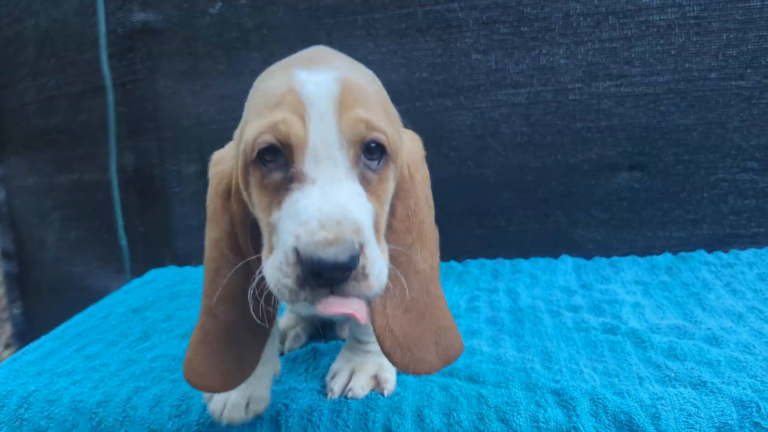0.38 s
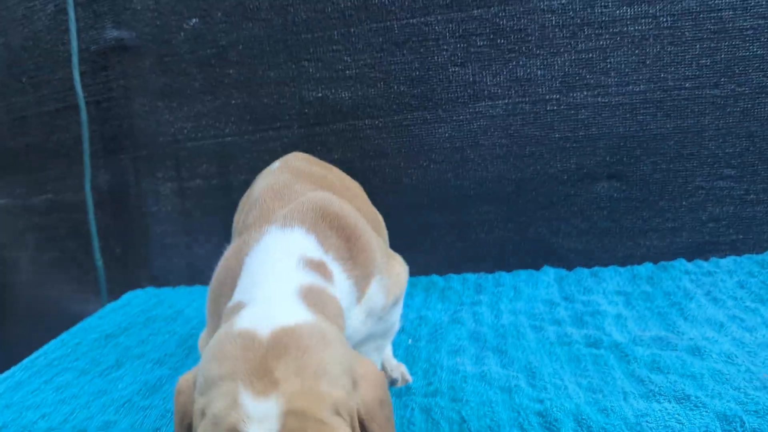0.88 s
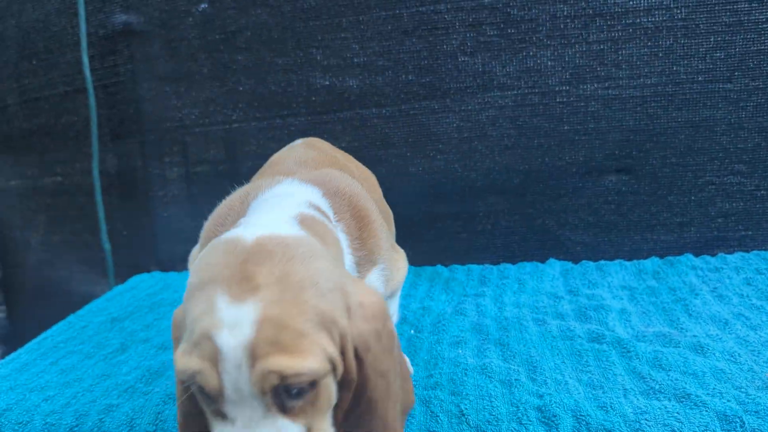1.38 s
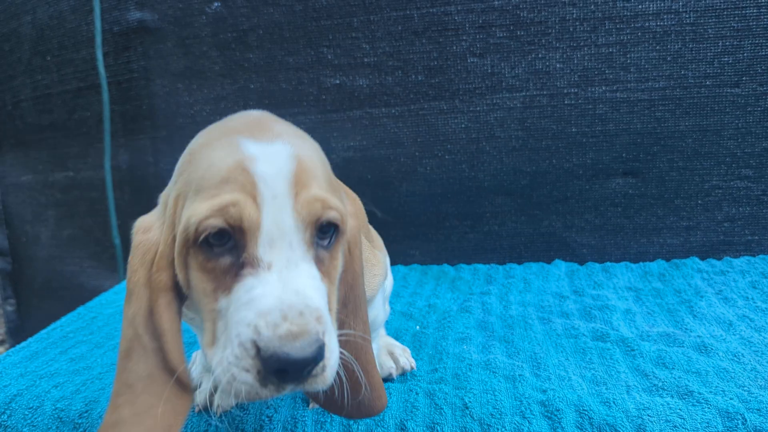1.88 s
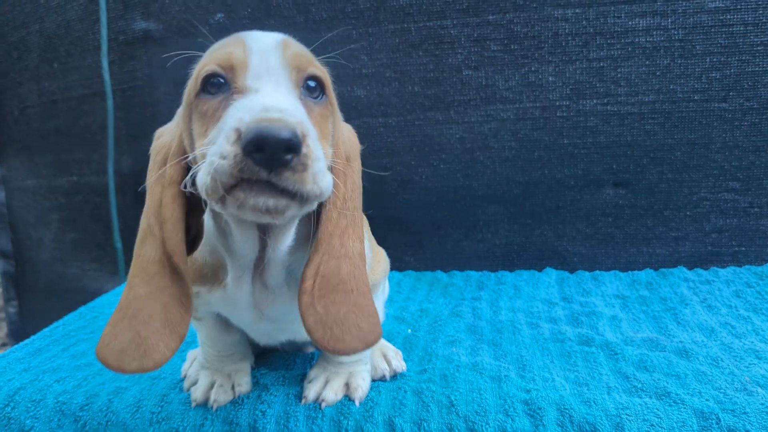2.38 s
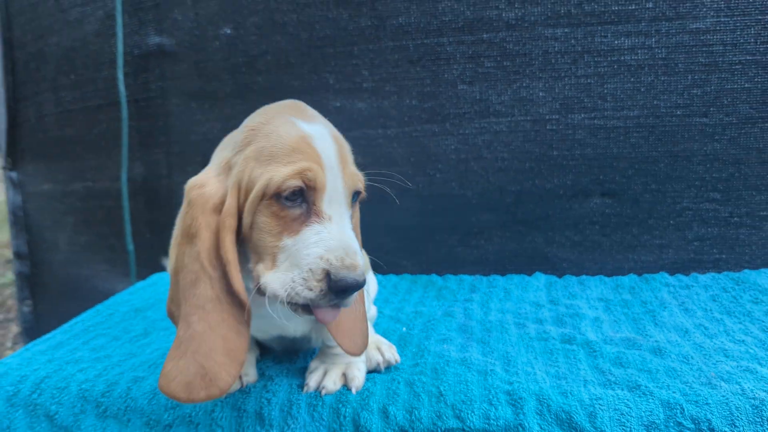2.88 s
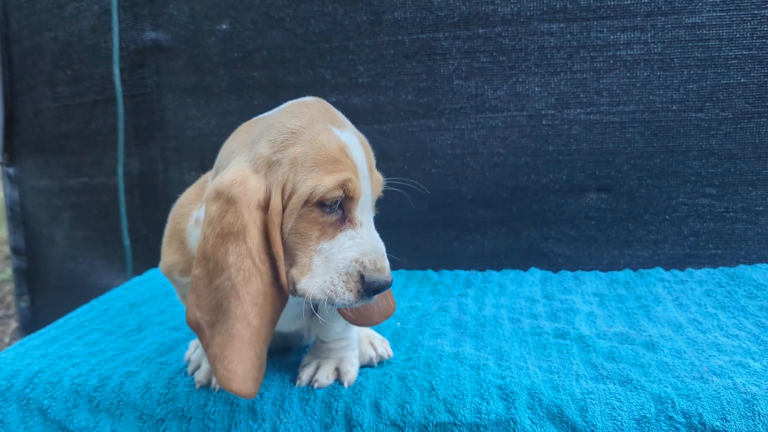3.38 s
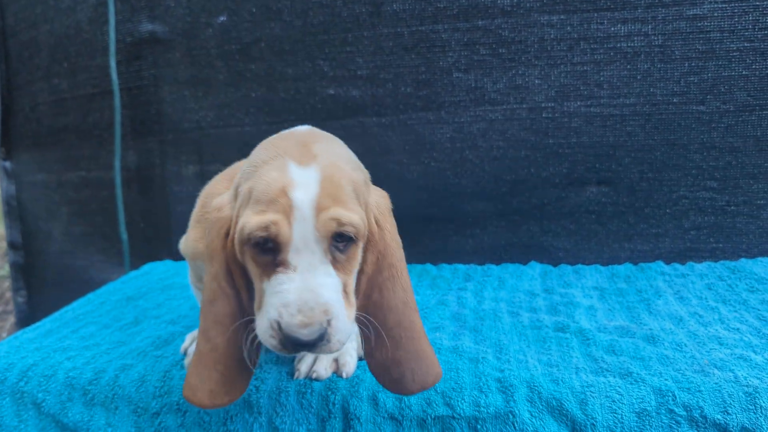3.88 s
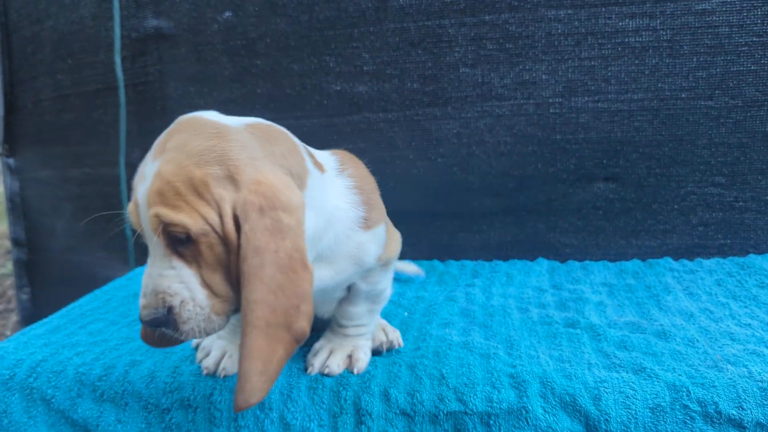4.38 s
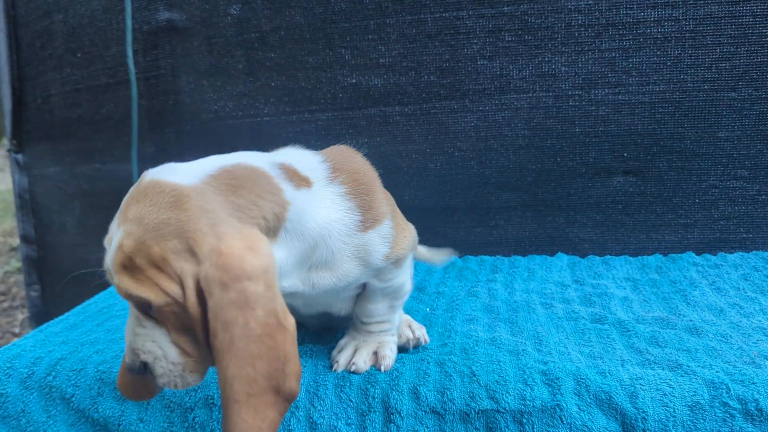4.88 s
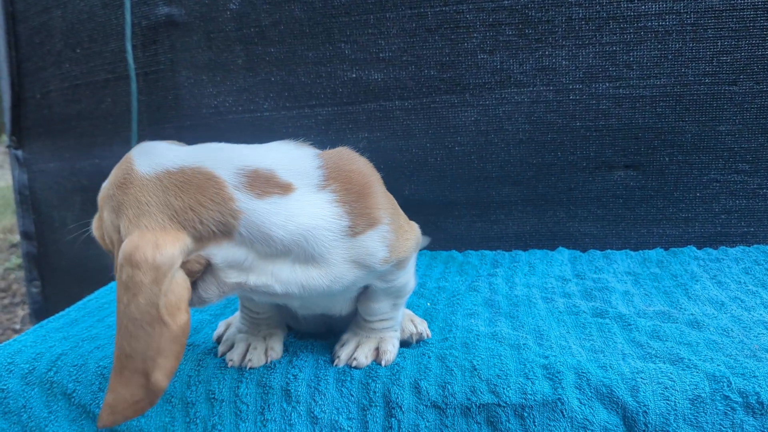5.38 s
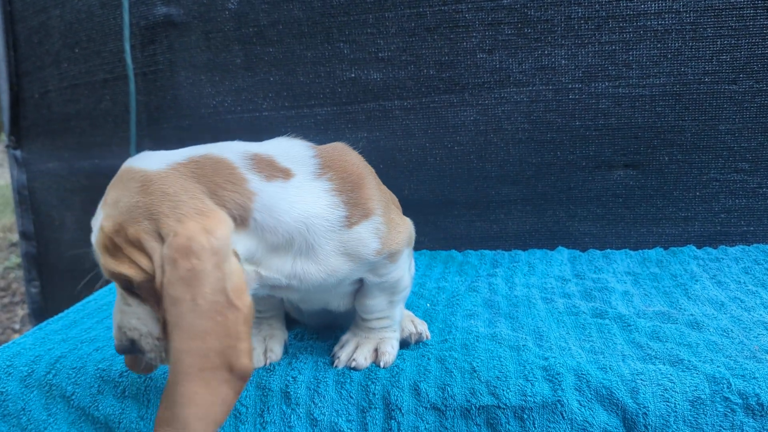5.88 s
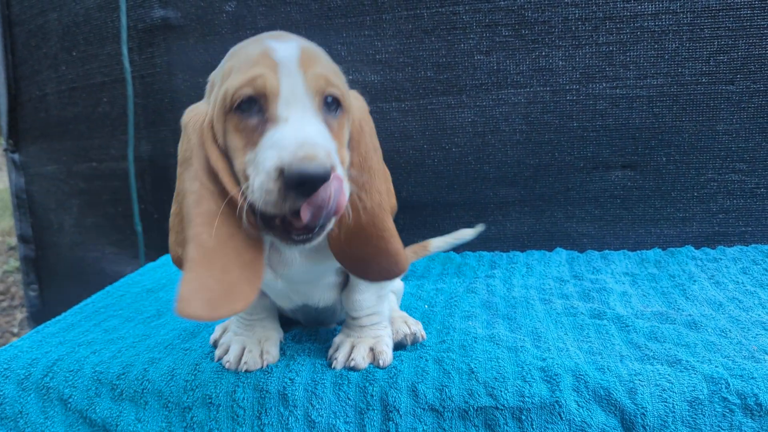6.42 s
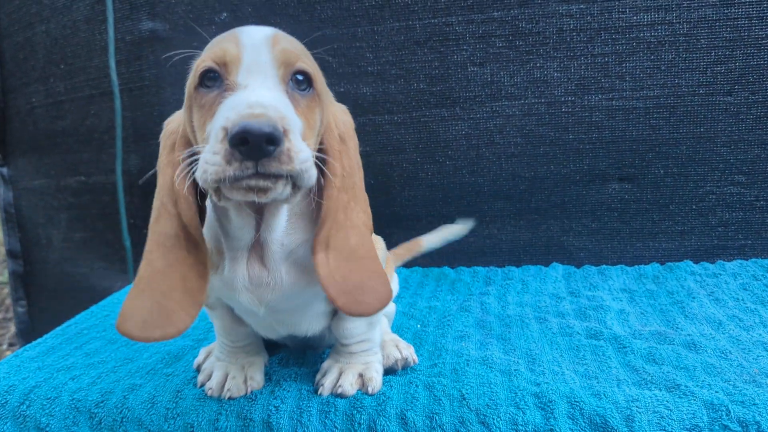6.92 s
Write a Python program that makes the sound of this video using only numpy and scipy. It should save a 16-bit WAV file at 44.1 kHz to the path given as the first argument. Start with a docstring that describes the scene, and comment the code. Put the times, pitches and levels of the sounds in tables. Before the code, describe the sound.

Close puppy sniffs, sharp clicks and soft paw thumps over thin insect song, a distant howl, hard handling taps, a low engine drone and a final nasal squeak.

```python
"""Insects sing over a low rumble; after a faint rustle a puppy sniffs, licks, ticks, whines and steps close by.
Fingers then rub and tap the camera by its right port, a far dog howls, an engine drone swells; last come
whimpers, a sigh and nasal whistles. Voices are harmonic sums, hisses are shaped noise, and knocks are
decaying modes. Resonators and sparse decaying echoes supply the insects' rasp and the reverberation."""
import sys
import numpy as np
from scipy import signal
from scipy.io import wavfile
from scipy.ndimage import uniform_filter1d

SR = 44100
rng = np.random.default_rng(int(sys.argv[2]) if len(sys.argv) > 2 else 0)


def natural_amplitude(level_db):
    """Convert a level in decibels to a linear amplitude factor, elementwise."""
    exponent = np.asarray(level_db, float) / 20
    return 10 ** exponent


def wrap_up_sound(samples):
    """Save the sound to the file named by the first command line argument, as 16-bit audio."""
    columns = np.atleast_2d(samples).T
    # keep every value between -1 and 1, then stretch to whole-number steps
    tamed = np.clip(columns, -1, 1)
    steps = np.round(tamed * 32767).astype(np.int16)
    wavfile.write(sys.argv[1], SR, steps)


N = 310023
T = np.arange(N) / SR

# swelling insect band: (time [s], level [dB], centre frequency [Hz])
INSECT_BAND = [(0, -62, 4250), (.47, -67.5, 4227), (1, -56, 4220), (1.25, -62.5, 4225), (1.8, -53.5, 4228),
               (2.12, -59, 4233), (2.7, -57.5, 4283), (3.28, -60.5, 4267), (3.55, -57, 4273),
               (3.82, -49, 4130), (4.05, -57.5, 4250), (4.3, -61, 4210), (4.55, -49.5, 4354),
               (5, -62.5, 4243), (5.45, -55, 4237), (5.72, -56, 4370), (5.97, -63.5, 4208),
               (6.2, -50.5, 4166), (6.46, -53, 4207), (6.68, -59.5, 4280), (7.03, -49.5, 4334)]
CHORUS_MEAN_DB = -58
# engine drone: (time [s], firing frequency [Hz], tone level [dB])
ENGINE = [(0, 79.1, -84), (2.4, 81.1, -91.5), (2.9, 80.5, -80), (3.4, 80.45, -65), (3.8, 81.48, -59.5),
          (5.6, 81.64, -58), (6.15, 77.4, -58), (6.7, 79.5, -58), (7.03, 79.2, -56.5)]
RUMBLE_NEAR_DB = -68.5
# likeness of left and right in the far sounds: (frequency [Hz], correlation [0-1])
LIKENESS = [(60, 0.86), (180, 0.9), (550, 0.5), (1650, 0.01), (4970, 0.027), (15000, 0.033)]


def read(points, hz):
    """Interpolation on a logarithmic frequency axis."""
    f, value = np.transpose(points)
    return np.interp(np.log(hz + 1), np.log(f + 1), value)


def joined(tables, t, edge=0.028):
    """Linear interpolation of the columns at times t, and a gate with ramps of edge seconds around each table."""
    s, *columns = np.transpose(np.concatenate(tables))
    gates = [np.clip(np.minimum(t - r[0][0], r[-1][0] - t) / edge + 1, 0, 1) for r in tables]
    return np.max(gates, 0), [np.interp(t, s, c) for c in columns]


def panned(pan_db):
    """Interchannel level difference (left minus right): two gains whose mean is 1."""
    ratio = natural_amplitude(pan_db)
    return np.array([2 * ratio / (1 + ratio), 2 / (1 + ratio)])


def wander(smooth_s):
    """Low-pass random modulation: noise averaged twice over smooth_s, scaled to rms 1."""
    span = max(int(smooth_s * SR), 2)
    x = uniform_filter1d(uniform_filter1d(rng.standard_normal(N), span), span)
    return x / x.std()


def noise(gain, same, size, patchy_db=1.0):
    """Spectral shaping of noise by gain(hz, t), with correlation same(hz) and random patches."""
    hz, t, z = signal.stft(rng.standard_normal((3, N)), SR, nperseg=size, noverlap=size * 3 // 4)
    hz = hz[:, None]
    patches = uniform_filter1d(uniform_filter1d(abs(z[2]), size=10, axis=0), size=24, axis=1)
    patches = patches - patches.mean()
    c = np.clip(same(hz), -1, 1)
    pair = np.array([z[0], c * z[0] + np.sqrt(1 - c ** 2) * z[1]])
    pair *= gain(hz, t) * natural_amplitude(patchy_db * patches / patches.std())
    return signal.istft(pair, SR, nperseg=size, noverlap=size * 3 // 4)[1][:, :N]


def resonate(x, hz, width_hz):
    """Heterodyne resonator: shifts the curve hz to zero, smooths by two equal poles and shifts back."""
    turn = np.exp(2j * np.pi * np.cumsum(hz) / SR)
    r = np.exp(-np.pi * width_hz / SR)
    smooth = signal.lfilter([(1 - r) ** 2], [1, -2 * r, r * r], x / turn + 1e-18)
    return 2 * (turn * smooth).real


def add(mix, s, sound, pan_db):
    """Superposition: adds a short sound to the mix at time s."""
    part = mix[:, round(s * SR):][:, :len(sound)]
    part += panned(pan_db)[:, None] * sound[:part.shape[1]]


def tail(decays, gap_s):
    """Reverberation: sparse echoes of random sign after gap_s, each band with its own decay time."""
    taps = np.zeros((2, 2 * SR))
    at = np.arange(int(gap_s * SR), 2 * SR - 20, 20)
    at = at + rng.integers(0, 20, (2, len(at)))
    np.put_along_axis(taps, at, rng.choice([-1., 1.], at.shape), 1)
    taps[1] = 0.5 * taps[0] + 1.86 * taps[1]
    hz, t, z = signal.stft(taps, SR, nperseg=512)
    out = signal.istft(z * natural_amplitude(-60 * t / read(decays, hz)[:, None]), SR, nperseg=512)[1]
    return out / np.linalg.norm(out[0])


def chorus():
    """Resonance: the rasp of many insects excites two close wing resonances and throbs near 39 Hz."""
    strands, strand_spread_hz, strand_db = 4, 129.6, -6  # single singers that waver inside the band
    _, (level_db, hz) = joined([INSECT_BAND], T)
    pan_db = -4.5 - 0.28 * (level_db - CHORUS_MEAN_DB)  # the swells come from the right
    throb = 1 + 0.18 * np.sin(2 * np.pi * np.cumsum(39 * (1 + 0.029 * wander(0.28))) / SR)
    a, b = rng.standard_normal((2, 2, N))
    pair = np.array([a, .5 * a + 1.9 * b]) * throb
    rasp = resonate(pair[:, 0], hz - 80, width_hz=253) + resonate(pair[:, 1], hz + 80, width_hz=250)
    for _ in range(strands):
        strand_hz = hz + strand_spread_hz * wander(0.1225)
        strand = resonate(rng.standard_normal(N) * throb ** 2, strand_hz, width_hz=54)
        rasp += natural_amplitude(strand_db) * rasp.std() * strand / strand.std() / np.sqrt(strands)
    return rasp / rasp.std() * natural_amplitude(level_db) * panned(pan_db)


def crickets():
    """Amplitude modulation: each phrase is a row of soft tone pulses under an arch, blurred by distance."""
    # phrases: (centre of first pulse [s], pitch [Hz], relative level [dB])
    phrases = [(0, 5330, -72), (1.373, 5370, -60.5), (1.665, 5300, -56.5), (1.743, 5840, -78),
               (2.202, 5500, -78), (2.289, 5340, -57.5), (2.945, 5320, -58.5), (2.995, 6100, -64.5),
               (3.198, 5360, -61.5), (3.555, 5280, -57), (3.95, 5380, -63), (4.2, 6030, -78),
               (4.322, 5280, -58.5), (4.706, 5410, -56.5), (4.993, 6030, -67), (5.133, 5300, -52),
               (5.295, 5980, -68), (5.65, 5530, -58), (5.706, 6100, -64), (6.081, 5430, -56.5),
               (6.103, 6250, -60.5), (6.173, 5310, -51), (6.923, 5320, -50)]
    pulse_count, pulse_s = 5, .0435
    mix = np.zeros((2, N))
    for first, hz, db in phrases:
        t = np.arange(0, pulse_count * pulse_s, 1 / SR)
        pulses = 0.28 + np.sin(np.pi * t / pulse_s) ** 4
        arch = abs(np.sin(np.pi * t / t[-1])) ** 0.27
        blur = resonate(rng.standard_normal(SR)[:len(t)], np.full(len(t), hz), width_hz=180)
        tone = np.sin(2 * np.pi * hz * t) + 0.57 * blur / blur.std()
        add(mix, max(first - pulse_s / 2, 0), natural_amplitude(db - 10.5) * arch * pulses * tone, -14)
    return mix


def rumble_db(t):
    """Power sum of two rumbles: the engine's, which grows with its tone, and one that fades from the start."""
    tone_db = joined([ENGINE], t)[1][1]
    engine_db = RUMBLE_NEAR_DB + 0.65 * (tone_db + 59)
    first_db = -75.5 - 11 * t
    return 20 * np.log10(np.hypot(natural_amplitude(engine_db), natural_amplitude(first_db)))


def drone():
    """Periodic combustion: a wavering firing tone with weak higher orders over low rumble."""
    # rumble spectrum: (frequency [Hz], relative level [dB])
    rumble_colour = [(28, -30.5), (42, -1.5), (60, -2), (75, 3), (100, -16.5), (250, -18), (500, -21.5),
                     (1000, -28), (2500, -63.5)]
    _, (hz, tone_db) = joined([ENGINE], T)
    phase = 2 * np.pi * np.cumsum(hz * (1 + 0.01126 * wander(0.034))) / SR
    tone = np.sin(phase) + natural_amplitude(-22) * np.sin(9 / 4 * phase) + natural_amplitude(-24) * np.sin(11 / 4 * phase)
    rumble = noise(lambda f, t: natural_amplitude(rumble_db(t) + read(rumble_colour, f) + 32.5),
                   lambda f: read(LIKENESS, f), size=2048)
    return np.sqrt(2) * natural_amplitude(tone_db + 0.98 * wander(0.026)) * tone + rumble


def air():
    """Diffuse field: a far wash whose treble swells with the insects and whose lower part with the rumble."""
    # spectrum of the wash: (frequency [Hz], relative level [dB])
    wash_colour = [(30, -31.5), (95, -32), (165, -47), (330, -46), (600, -43), (2000, -31), (3500, -29),
                   (4900, -26), (5700, -19.5), (6500, -24), (7300, -30.5), (7800, -36.5), (12000, -34),
                   (15000, -35)]
    # balance of the wash: (frequency [Hz], left minus right [dB])
    wash_balance = [(60, 10), (130, -1), (290, -7), (640, 3.5), (1410, 1), (3100, 1.5), (6820, -4),
                    (15000, 4.5)]

    def gain(hz, t):
        treble_db = 0.66 * (joined([INSECT_BAND], t)[1][0] - CHORUS_MEAN_DB)
        middle_db = 10.5 + 0.31 * (rumble_db(t) - RUMBLE_NEAR_DB)
        high = read([(2500, 0), (6000, 1)], hz)
        swell_db = high * treble_db + (1 - high) * middle_db
        return natural_amplitude(-41.5 + read(wash_colour, hz) + swell_db) * panned(read(wash_balance, hz))
    return noise(gain, lambda hz: read(LIKENESS, hz), size=1024, patchy_db=.7)


def sniffs():
    """Broadband noise: sniffs, licks and a faint opening rustle hiss brightly, with a low part of their own."""
    # hisses: (start [s], peak [s], end [s], relative peak level [dB], relative level of the low part [dB])
    hiss_list = [(0, 0.157, 0.26, -80.5, 4.5), (0.312, 0.32, 0.44, -71.5, -15),
                 (0.494, 0.508, .585, -65.5, -41), (0.583, 0.627, 0.75, -64.5, -0.5),
                 (1.996, 2.014, 2.05, -69, -6.5), (2.357, 2.388, 2.42, -66, -1),
                 (2.463, 2.481, 2.55, -67.5, -27), (2.98, 3.078, 3.15, -75, 4.5),
                 (3.278, 3.335, 3.446, -54, -3.5), (3.55, 3.754, 3.95, -78.5, -4),
                 (4.117, 4.144, 4.17, -74.5, -18), (5.67, 5.72, 5.9, -79, 0.5),
                 (6.45, 6.628, 6.66, -60.5, -7), (6.694, 6.825, 7.05, -65.5, -8)]
    # hiss spectrum: (frequency [Hz], relative level [dB])
    hiss_colour = [(150, 9), (600, 1.5), (3000, 4), (6000, 2.5), (9000, -7), (12000, -2.5), (15000, -2.5),
                   (16500, -11)]
    quiet_db, fade_db_per_db = -80, 1.13  # each hiss rises from and sinks towards quiet
    hisses = []
    for *times, db, low_db in hiss_list:
        edge_db = db + fade_db_per_db * (quiet_db - db)
        hisses.append([(s, point_db, low_db) for s, point_db in zip(times, (edge_db, db, edge_db))])

    def gain(hz, t):
        gate, (level_db, low_db) = joined(hisses, t, 0.01)
        low = read([(3000, 1), (9000, 0)], hz)
        return gate * natural_amplitude(level_db + read(hiss_colour, hz) + low * low_db + 9.5) * panned(1.3)[:, None, None]
    return noise(gain, lambda hz: .4, size=256, patchy_db=1.2)


def ticks():
    """Damped resonance: short noise bursts of tongue and claws ring one broad mode each."""
    # ticks: (start [s], peak level [dB], ring frequency [Hz], left minus right [dB])
    tick_list = [(0.055, -57.5, 2800, -20), (0.163, -53.5, 2780, -18), (.27, -62, 2700, -1),
                 (0.396, -59, 2900, 1), (.683, -42.5, 1920, 14), (.751, -58, 2140, -9),
                 (0.898, -38.5, 1800, -1), (.951, -29, 2500, -6), (.962, -34.5, 2490, -0.5),
                 (1.093, -34, 2840, -1), (2.009, -52.5, 3320, -3), (2.325, -44, 4320, -13),
                 (5.028, -53, 2523, -1)]
    mix, t = np.zeros((2, N)), np.arange(6000) / SR
    for s, db, hz, pan_db in tick_list:
        burst = rng.standard_normal(len(t)) * natural_amplitude(-60 * t / 0.022) * np.minimum(t / 0.00048, 1)
        ring = resonate(burst, np.full(len(t), hz), width_hz=980) + 0.026 * burst
        add(mix, s, natural_amplitude(db) * ring / abs(ring).max(), pan_db)
    return mix


def whistle_tones(tables, second_db, pan_db):
    """Near-sinusoidal oscillation: a tone of slightly unsteady pitch with a faint octave."""
    gate, (hz, level_db) = joined(tables, T, 0.001)
    phase = 2 * np.pi * np.cumsum(hz * (1 + 0.0049 * wander(0.00084))) / SR
    tone = np.sin(phase) + natural_amplitude(second_db) * np.sin(2 * phase)
    return np.sqrt(2) * gate * natural_amplitude(level_db) * tone * panned(pan_db)[:, None]


def faint_whines():
    """Exponential envelope: each whine rises quickly and trails off about one pitch."""
    # whines and whistles: (start [s], length [s], pitch [Hz], greatest rms level [dB], left minus right [dB])
    whine_list = [(0.064, 0.093, 964, -58.5, 8), (0.105, .2, 6360, -66, -8), (0.151, 0.15, 929, -55.5, 6),
                  (6.364, 0.25, 7000, -65, -12)]
    rise_s, start_db, end_db = 0.024, -18, -32.5  # ends are relative to the peak
    total = 0
    for s, length, hz, db, pan_db in whine_list:
        course = [(s, hz, db + start_db), (s + rise_s, hz, db), (s + length, hz, db + end_db)]
        total = total + whistle_tones([course], second_db=-22, pan_db=pan_db)
    return total


def thumps():
    """Impact on padding: paws and body excite two damped partials while cloth crumples under the weight."""
    # thumps: (start [s], relative strength [dB], ring frequency [Hz], t60 [s], left minus right [dB])
    thump_list = [(0.363, -54, 102.5, 0.059, 1.5), (0.613, -67, 414, 0.08, -1), (0.636, -44, 385, 0.042, 3),
                  (0.649, -47.5, 149, 0.11, 2), (1.692, -61.5, 484, 0.029, -17),
                  (2.025, -45, 244, 0.057, 2), (2.201, -61.5, 91, 0.057, 2),
                  (2.742, -53.5, 141, 0.075, 1.5), (5.146, -54.5, 164, 0.12, 1.0),
                  (6.253, -51.5, 220, 0.05, -15), (6.283, -44.5, 169.8, 0.037, -22),
                  (6.89, -52, 160, 0.06, 2)]
    mix, t = np.zeros((2, N)), np.arange(6000) / SR
    for s, db, hz, t60, pan_db in thump_list:
        ring = np.sin(2 * np.pi * hz * t)
        ring += 0.75 * np.sin(2 * np.pi * 1.85 * hz * t) * natural_amplitude(-40 * t / t60)
        grain = int(0.305 * SR / hz)  # cloth grain, as a share of the ring's cycle
        cloth = uniform_filter1d(rng.standard_normal(len(t)), size=grain)
        ring += .7 * np.sqrt(grain) * uniform_filter1d(cloth, size=grain)
        add(mix, s, natural_amplitude(db + 7 - 60 * t / t60) * np.minimum(t / 0.0077, 1) * ring, pan_db)
    return mix


def rubs():
    """Friction: skin dragged over the right port gives grainy noise, weak in the left channel up to 9 kHz."""
    # strokes: (time [s], relative pressure level [dB], speed as treble lift [dB])
    strokes = [
        [(.765, -68.5, -28), (.785, -54, -38), (.792, -37.5, -21), (.808, -38.5, -6), (.82, -48, 16),
         (.845, -53, 11.5), (.89, -48.5, 1.5), (.915, -63, -4), (.958, -63, -5)],
        [(.962, -68.5, -5), (1.03, -55, -1.5), (1.06, -44.5, -1.5), (1.1, -46.5, 6.5), (1.14, -56.5, 9.5),
         (1.18, -84, -5)],
        [(1.48, -96, 13), (1.6, -73, -2), (1.69, -100, 2)],
        [(2.31, -101, 3), (2.335, -76.5, -4), (2.42, -90, -4)],
        [(4.44, -67, -37), (4.485, -68, -27), (4.5, -55, -15), (4.64, -66.5, -26), (4.72, -77, -24)],
    ]
    # friction spectrum: (frequency [Hz], relative level [dB])
    friction_colour = [(60, -4), (350, 8.5), (2000, -3), (4500, 2.5), (7500, -0.5), (10000, -8.5),
                       (12500, -32), (16000, -27)]
    balance = [(300, -19.5), (2500, -31.5), (9000, -37.0), (14000, 0.0)]  # (Hz, left minus right dB)

    def gain(hz, t):
        gate, (level_db, treble_db) = joined(strokes, t, 0.0057)
        bass_db = -8 - 0.35 * treble_db - 0.22 * (level_db + 50)  # slow, light strokes rumble more
        treble = read([(2500, 0), (7000, 1)], hz)
        bass = read([(400, 1), (1500, 0)], hz)
        colour_db = read(friction_colour, hz) + treble * treble_db + bass * bass_db
        return gate * natural_amplitude(level_db + colour_db + 10.5) * panned(read(balance, hz))
    return noise(gain, lambda hz: .2, size=256, patchy_db=1.03) * natural_amplitude(2.7 * wander(0.0003))


def taps():
    """Modal excitation: a hard fingertip's crack sounds together with the modes of the camera body."""
    # taps: (start [s], relative strength [dB], relative bass level [dB], left minus right [dB])
    tap_list = [(0.788, -39.5, -14, -30), (3.749, -40, 0, -37), (4.4386, -66.5, 24, -20),
                (4.8415, -37.5, 0, -33), (4.8937, -34.5, -2, -35), (5.258, -49.5, 2.5, -18.5),
                (5.2802, -44, 6.5, -41), (6.2325, -48.5, 4, -32), (6.286, -60, 14.5, -14)]
    # body modes: (frequency [Hz], relative level [dB], t60 [s])
    body_modes = [(252, -4, 0.0092), (348, 6.5, 0.024), (566, 3, 0.013), (1130, -2.5, 0.013)]
    mix, t = np.zeros((2, N)), np.arange(6000) / SR
    body = sum(natural_amplitude(db - 60 * t / t60) * np.sin(2 * np.pi * hz * t) for hz, db, t60 in body_modes)
    dull = signal.butter(4, 5800, fs=SR)
    for s, db, bass_db, pan_db in tap_list:
        crack = 0.7 * rng.standard_normal(len(t)) * natural_amplitude(-60 * t / 0.028)
        crack[[0, 6]] += 3.5, -3  # two clicks of opposite sign
        add(mix, s, natural_amplitude(db + 3.5) * (signal.lfilter(*dull, crack) + natural_amplitude(bass_db - 10.0) * body), pan_db)
    return mix


def howl():
    """Source and filter: a clean fundamental, hoarse overtones and half lines reverberate in the yard."""
    # course of the howl: (time [s], pitch [Hz], relative fundamental level [dB])
    howl_course = [(2.887, 245.2, -63), (2.932, 362.5, -43), (2.992, 383.6, -30.5), (3.067, 372, -50),
                   (3.09, 387.3, -52), (3.141, 384, -34.5), (3.199, 377.6, -62), (3.23, 374.6, -44),
                   (3.33, 370.1, -46.5), (3.421, 351.3, -45.5), (3.52, 339.2, -45), (3.6, 311.5, -42),
                   (3.639, 278, -54), (3.69, 223, -64)]
    # throat response: (frequency [Hz], relative level [dB])
    throat = [(500, 3), (727, 7), (950, -8), (1170, 4), (1450, -0.5), (1700, -6), (1900, 0), (2150, -12.5),
              (2400, -13), (2800, -52)]
    # reverberation of the yard: (frequency [Hz], t60 [s])
    yard_decay = [(200, 0.76), (400, 1.21), (800, 2.3), (1800, 1.78), (4000, 0.61)]
    open_s, close_s = 0.053, 0.018  # mouth movements
    gate, (hz, fundamental_db) = joined([howl_course], T, 0.0041)
    start, end = howl_course[0][0], howl_course[-1][0]
    mouth = np.clip(np.minimum((T - start) / open_s, (end - T) / close_s), 0, 1)
    overtones = mouth ** 2 * natural_amplitude(-47 - 23.5 * (T - start))  # they fade steadily as the breath runs out
    phase = 2 * np.pi * np.cumsum(hz * (1 + 0.0043 * wander(0.0033))) / SR
    voice = natural_amplitude(fundamental_db) * (np.sin(phase) + natural_amplitude(-31.5) * np.sin(phase / 2) * wander(0.014))
    for k in np.arange(1.5, 8, .5):
        flutter = wander(.011)
        if k % 1 == 0:
            folds = 0.4 + 0.5 * flutter
        else:  # a strong fundamental comes with half lines
            folds = 0.33 * flutter * natural_amplitude(fundamental_db + 44.5)
        line = np.sin(k * phase + 6 * rng.random())
        voice += overtones * natural_amplitude(read(throat, k * hz) - 7.5) * folds * line
    breath = noise(lambda f, t: natural_amplitude(read([(250, -40)] + throat, f) - 2.5), lambda f: 1, size=1024)[0]
    # a steady ring near 1.7 kHz that lingers late in the howl
    late_ring = resonate(rng.standard_normal(N), np.full(N, 1726), width_hz=80)
    late_ring *= natural_amplitude(-68.5) * np.exp(-((T - 3.58) / .18) ** 2) / late_ring.std()
    source = np.sqrt(2) * gate * (voice + overtones * breath) + late_ring
    wet = signal.fftconvolve(source[None], tail(yard_decay, .03), axes=1)[:, :N]
    return (natural_amplitude(-1.5) * source + natural_amplitude(-9.5) * wet) * panned(3.2)[:, None]


def whimpers():
    """Harmonic series: a moving, mostly falling pitch whose overtones pass the nose or the open mouth."""
    # voiced cries, one table each: (time [s], pitch [Hz], fundamental rms level [dB], mouth opening [0-1])
    cries = [
        [(5.717, 786, -70, 0.71), (5.731, 751, -44.5, 0.6), (5.738, 696.4, -41.5, 0), (5.775, 713.5, -42, 0.1),
         (5.81, 667, -45.5, 0), (5.822, 566, -59.5, 0), (5.84, 440, -68, 0)],
        [(6.812, 858, -67, 0.54), (6.822, 873, -40, .4), (6.834, 852, -44, 0.88), (6.844, 765, -47.5, 0.86)],
        [(6.846, 733, -46, 0.84), (6.866, 729, -44, 0.65), (6.89, 704, -60, 0.7)],
        [(6.891, 725, -47.5, 0.64), (6.915, 696, -50.5, 1), (6.932, 600, -44.5, 0.63), (6.95, 570, -68, 0)],
    ]
    # overtones through the open mouth: (frequency [Hz], level against the fundamental [dB])
    open_mouth = [(1150, 16.5), (1400, -11), (1750, -8.5), (2050, -19), (2400, -11), (2800, -6), (3500, -9),
                  (4500, -10), (9000, -42)]
    # overtones through the nose alone: (frequency [Hz], level against the fundamental [dB])
    nose_only = [(1100, -30), (1400, -42), (1800, -22), (2100, -17.5), (2800, -24), (3300, -40),
                 (9000, -68)]
    gate, (hz, level_db, mouth) = joined(cries, T, 0.0033)
    mouth = np.clip(mouth, 0, 1)
    phase = 2 * np.pi * np.cumsum(hz * (1 + 0.0058 * wander(0.0024))) / SR
    voice = np.sin(phase)
    for k in range(2, 12):
        overtone_db = mouth * read(open_mouth, k * hz) + (1 - mouth) * read(nose_only, k * hz)
        voice += natural_amplitude(overtone_db + 1.9 * wander(0.0055)) * np.sin(k * phase)  # each overtone flickers
    return np.sqrt(2) * gate * natural_amplitude(level_db) * voice * panned(-6)[:, None]


def sigh():
    """Formant resonance: breath noise rings in the open mouth."""
    # course of the breath: (time [s], level [dB])
    sigh_course = [(6.505, -75), (6.52, -58.5), (6.55, -58), (6.59, -65.5), (6.68, -75)]
    # mouth resonances: (frequency [Hz], width of each smoothing pole [Hz], relative level [dB])
    formants = [(483, 220, 1.5), (1210, 130, 0.5), (2856, 240, -2), (2240, 300, -8.5)]
    gate, (level_db,) = joined([sigh_course], T)
    breath = rng.standard_normal(N)
    rings = 0
    for hz, width_hz, db in formants:
        rings = rings + natural_amplitude(db) * resonate(breath, np.full(N, hz), width_hz) / np.sqrt(width_hz)
    return gate * natural_amplitude(level_db) * rings / rings.std()


def nasal_whistles():
    """Near-sinusoidal oscillation: thin, high whistles in the nose."""
    # whistles, one table each: (time [s], pitch [Hz], fundamental rms level [dB])
    nose_courses = [
        [(6.712, 5370, -63), (6.73, 5530, -38.5), (6.76, 5725, -30), (6.79, 5812, -36), (6.82, 5800, -42),
         (6.83, 5750, -56), (6.848, 5640, -58)],
        [(6.872, 5920, -84), (6.882, 5760, -35.5), (6.892, 5710, -43.5), (6.902, 5840, -79)],
    ]
    return whistle_tones(nose_courses, second_db=-52, pan_db=-17)


def scene():
    """Superposition of all sources; the puppy's voice and breath get short echoes from the enclosure."""
    near = whimpers() + nasal_whistles() + faint_whines() + sigh()
    echoes = tail([(500, 0.11), (6000, 0.27)], 0.0047)  # (Hz, t60 s)
    pen = signal.fftconvolve(near.mean(0)[None], echoes, axes=1)[:, :N]
    backdrop = chorus() + crickets() + drone() + air()
    contacts = ticks() + thumps() + rubs() + taps()
    return near + natural_amplitude(-16) * pen + backdrop + sniffs() + contacts + howl()


def roll_off(x):
    """The treble ends steeply here."""
    return signal.sosfilt(signal.butter(12, 16120, fs=SR, output="sos"), x)


def record(dry):
    """High-pass filtering: the microphone's low cut at 37 Hz."""
    low_cut = signal.butter(4, 37, 'high', fs=SR, output='sos')
    finished = signal.sosfilt(low_cut, dry)
    return roll_off(finished)


dry = scene()
out = record(dry)
wrap_up_sound(out)
```